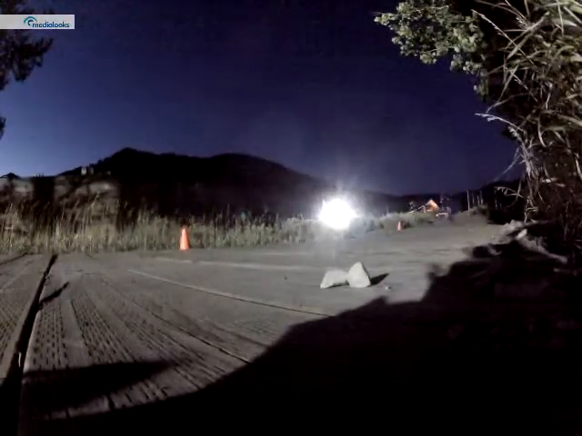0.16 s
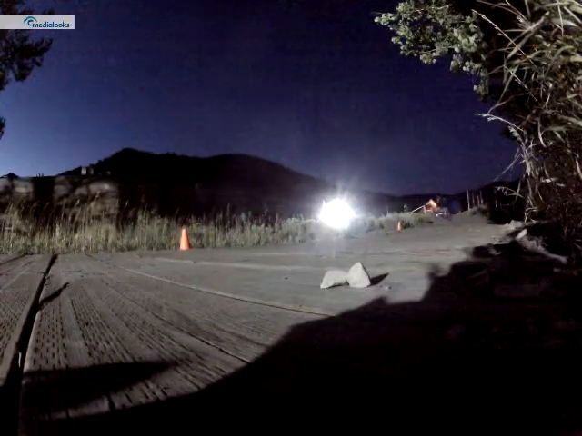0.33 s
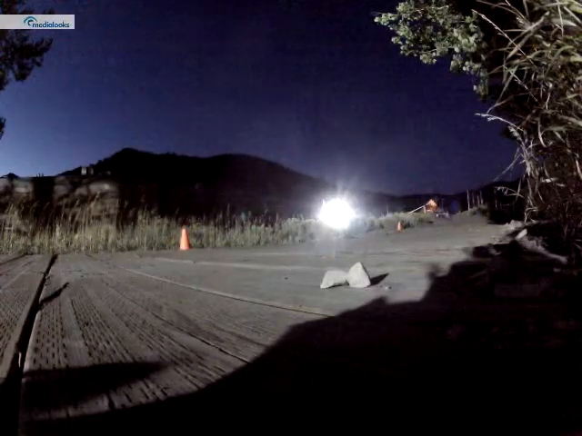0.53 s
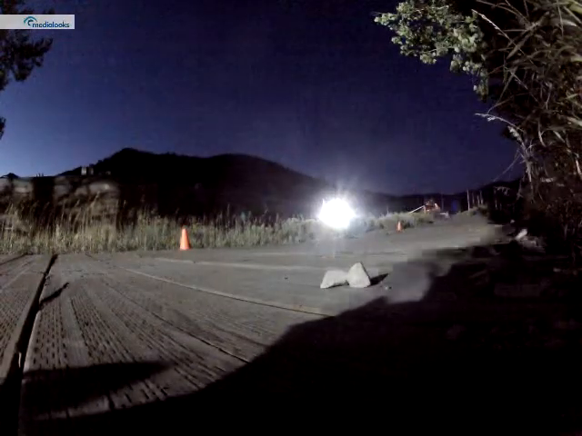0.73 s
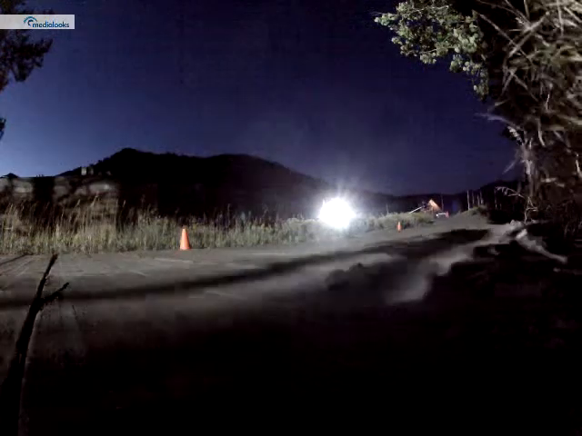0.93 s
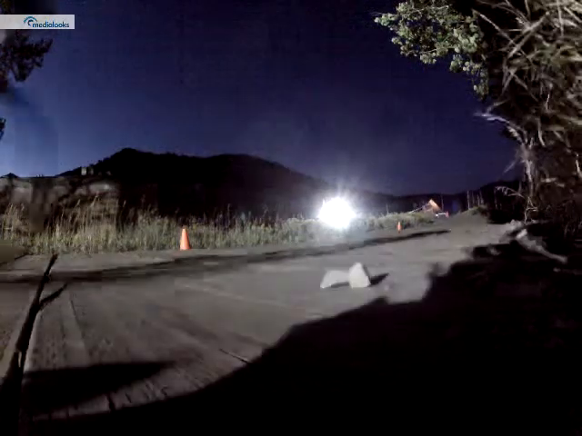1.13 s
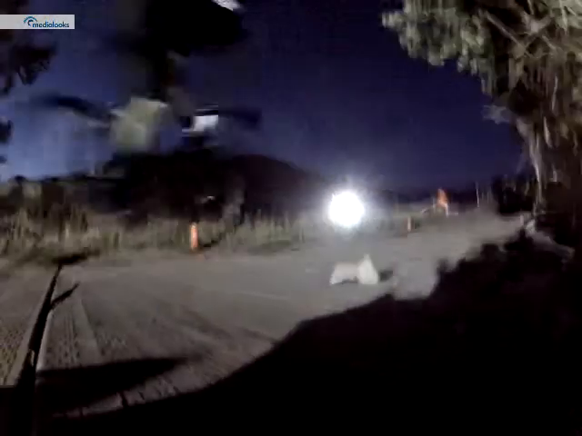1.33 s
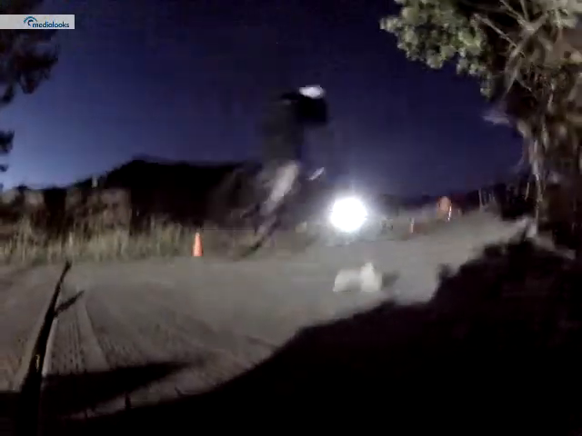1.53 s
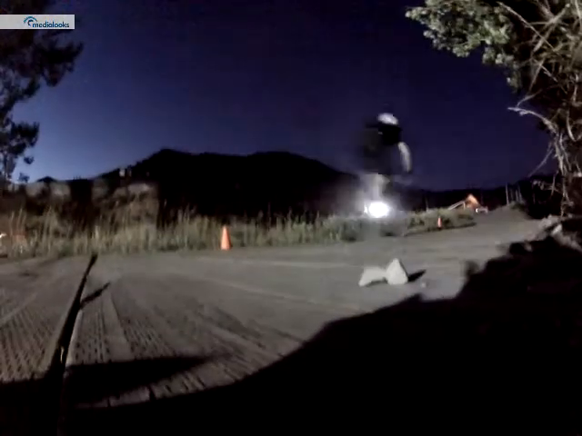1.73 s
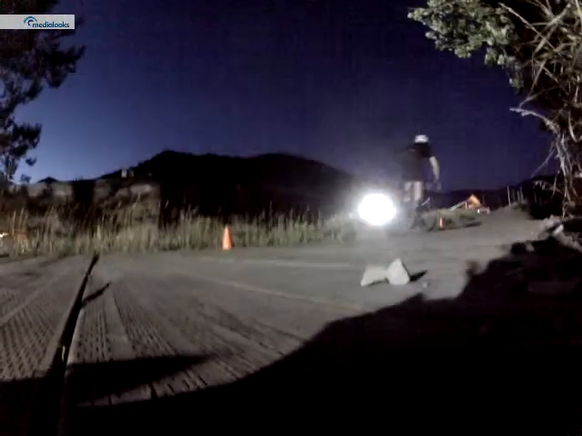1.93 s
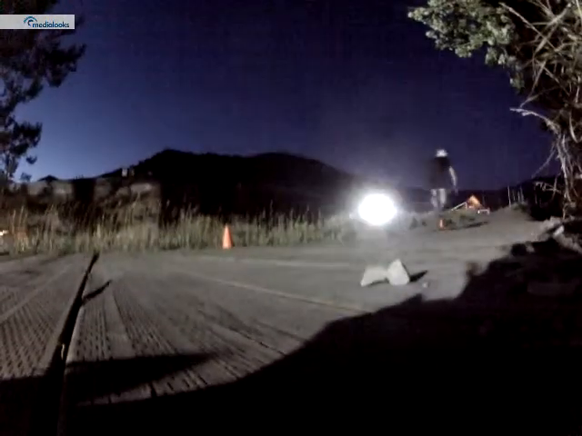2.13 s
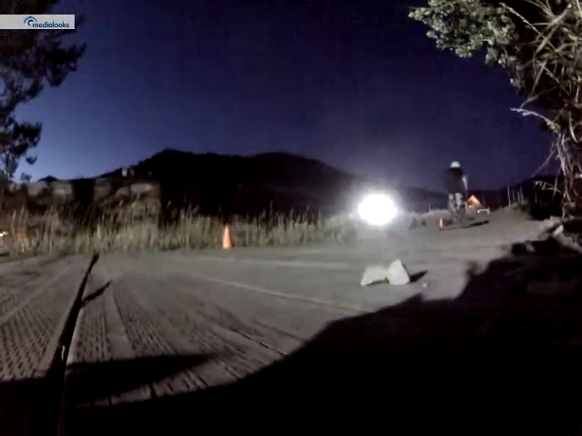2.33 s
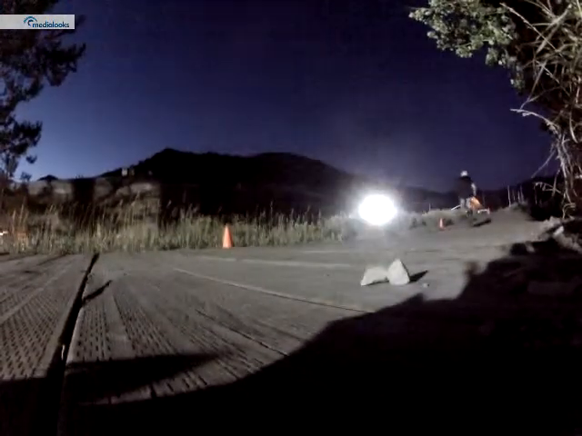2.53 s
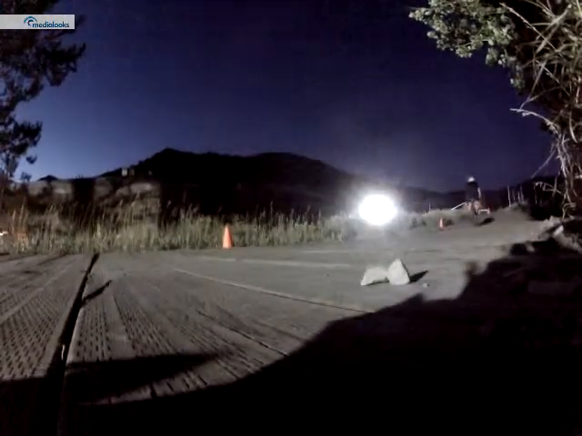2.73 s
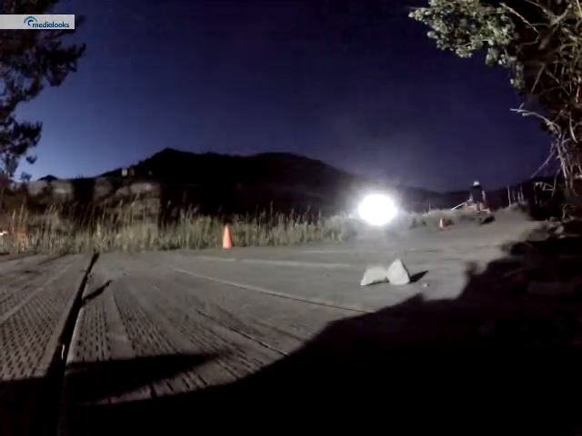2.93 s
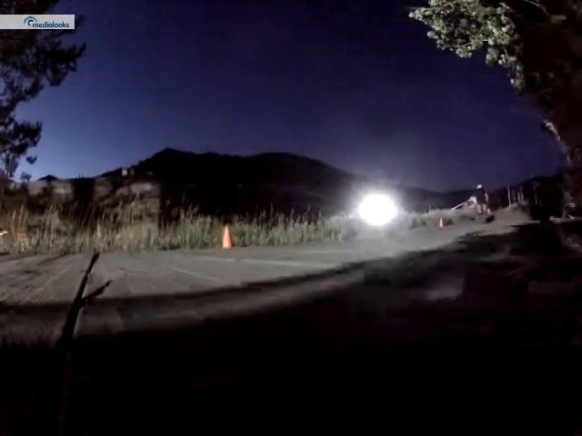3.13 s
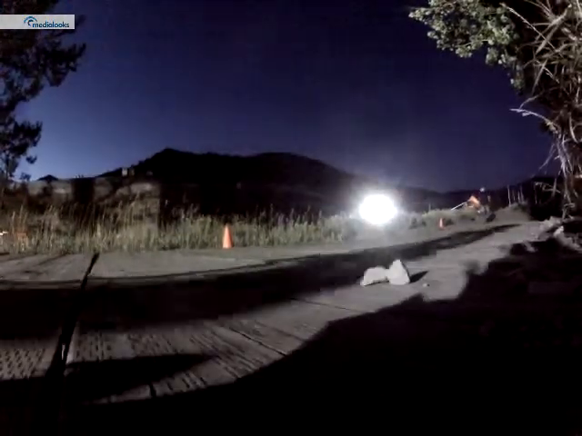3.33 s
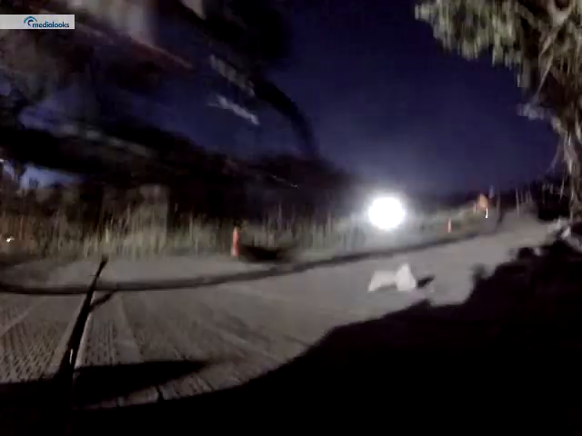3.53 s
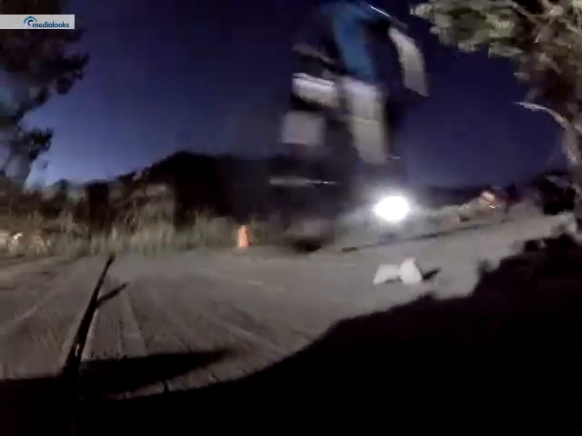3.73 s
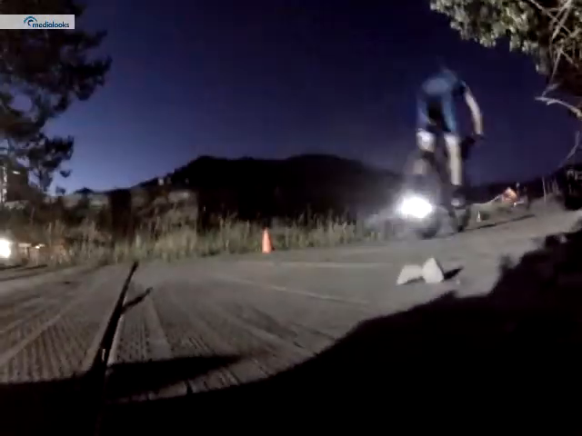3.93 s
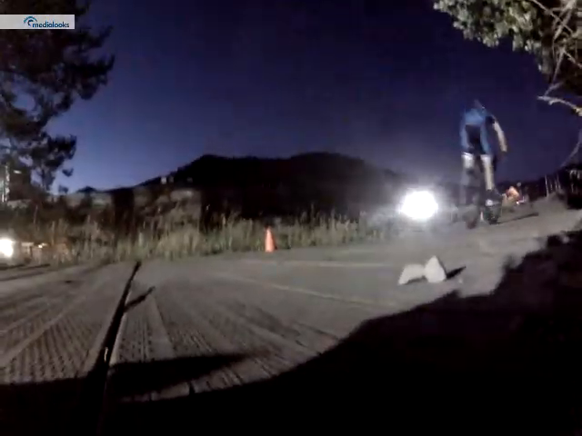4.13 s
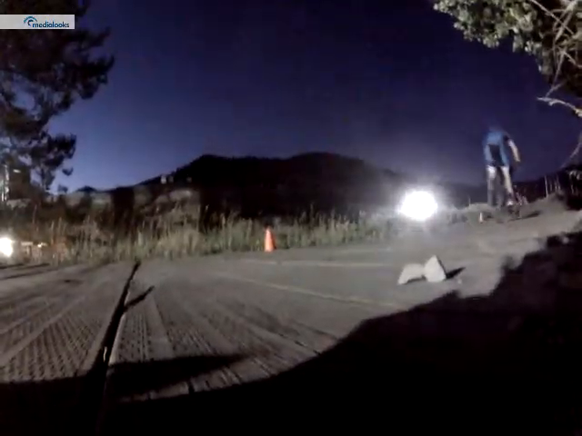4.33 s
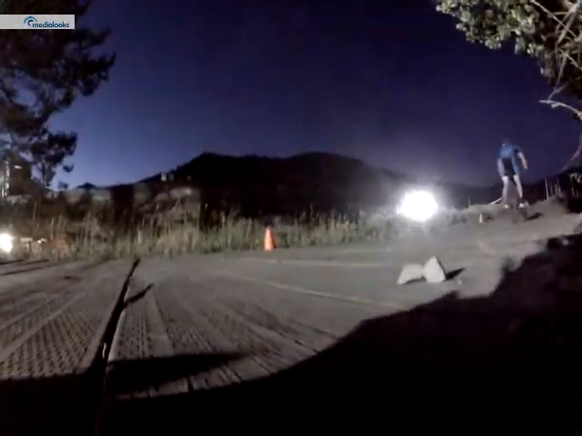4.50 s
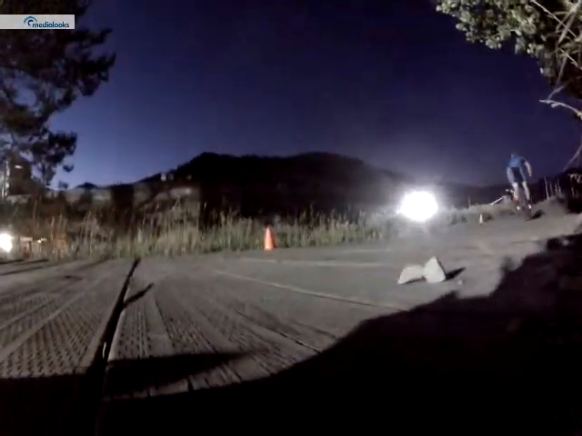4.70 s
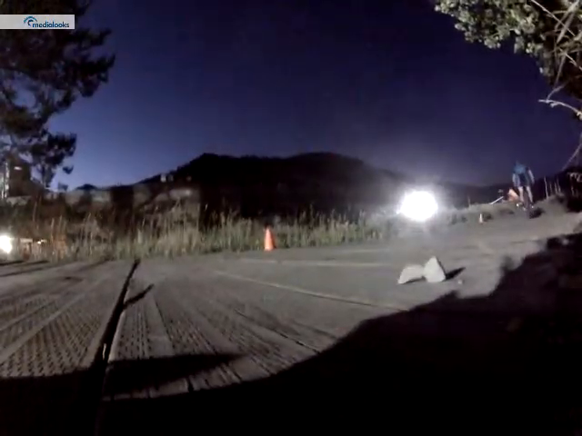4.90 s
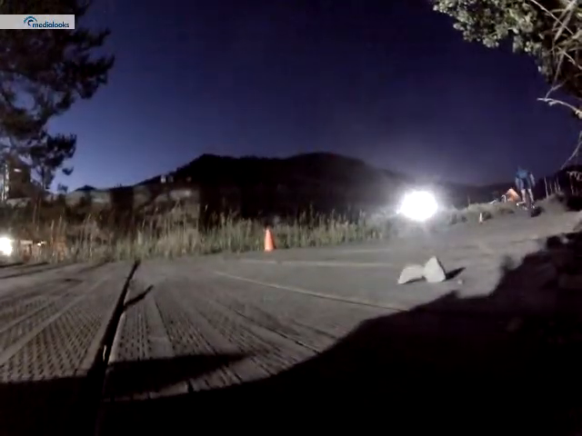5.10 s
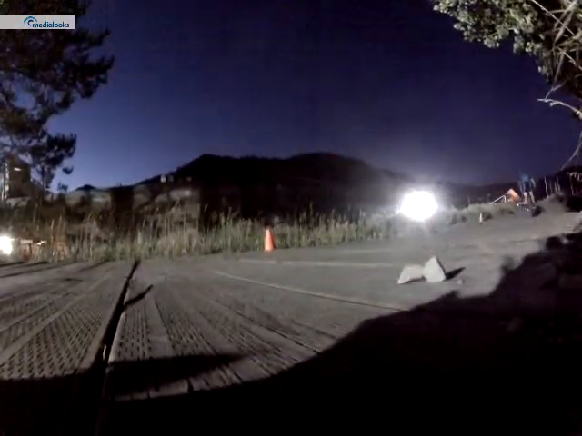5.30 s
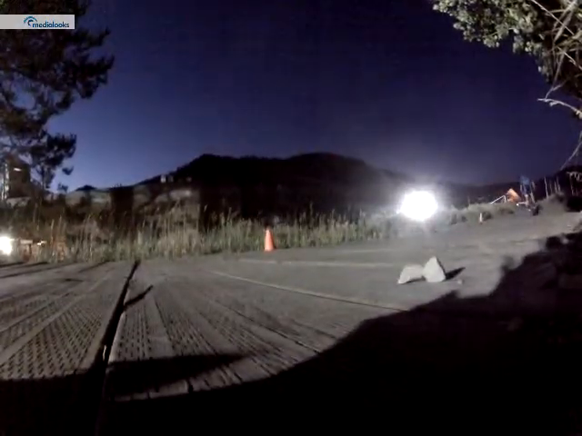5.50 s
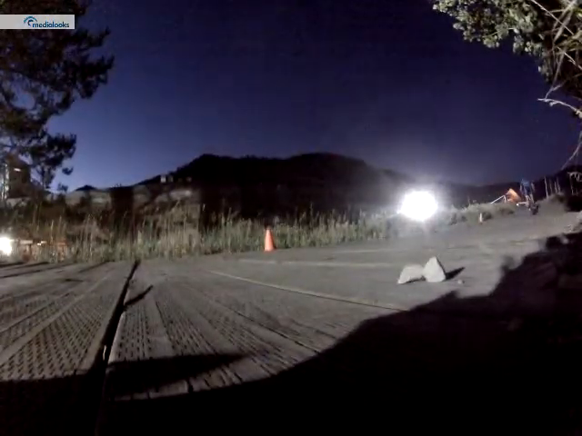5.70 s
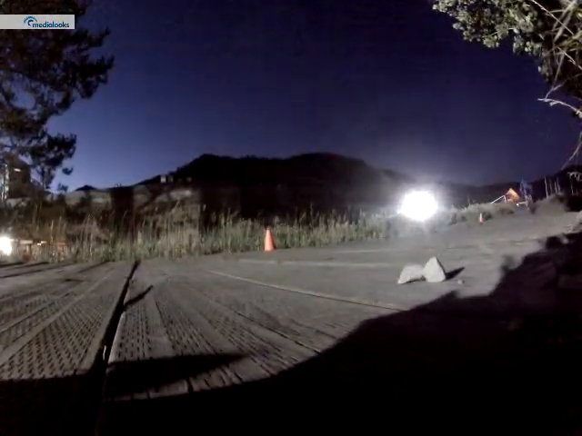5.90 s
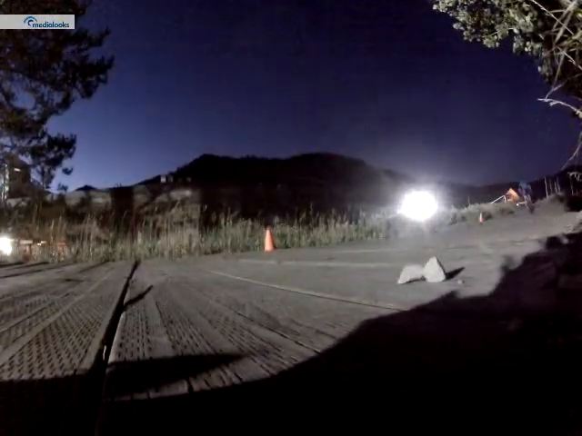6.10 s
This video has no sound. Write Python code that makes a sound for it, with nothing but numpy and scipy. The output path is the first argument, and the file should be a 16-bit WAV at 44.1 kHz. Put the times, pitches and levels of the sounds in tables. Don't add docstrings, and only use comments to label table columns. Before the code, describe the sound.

Two bicycles cross a plank deck in turn, right beside the microphone. Each pass bursts out of near silence with deep wooden rumble and a machine-gun clatter of plastic hopping on wood, with loose latch snaps, then dies away in light ticks. Between and after them there is only night air, hiss and a very low sway. The sound is boxy, distorted and harsh in the treble.

```python
import sys
import numpy as np
from scipy import signal
from scipy.fft import rfft, irfft
from scipy.io import wavfile
from scipy.ndimage import uniform_filter1d

SR = 44100
rng = np.random.default_rng(int(sys.argv[2]) if len(sys.argv) > 2 else 0)


def undo_db(level):
    steps = np.asarray(level, float) / 20
    return 10 ** steps


def persist_wave(psi):
    counts = np.round(np.clip(psi, -1, 1) * 32767).astype(np.int16)
    wavfile.write(sys.argv[1], SR, np.atleast_2d(counts).T)


N = 271215

# [t/s, level/dB]
SHAKE = [
    [(1.11, -62), (1.165, -32.5), (1.268, -12.5), (1.346, -17), (1.53, -14.5), (2.068, -26), (2.224, -31.5),
     (2.244, -42), (2.8, -65)],
    [(3.33, -59), (3.44, -33), (3.512, -9.5), (3.542, -14.5), (3.572, -4.5), (3.714, -20), (3.852, -14.5),
     (4.546, -36.5), (4.596, -44.5), (5.15, -66.5)],
]
# [t/s, f/Hz, level/dB]
SWAY = [
    [(0.0, 24, -52), (0.044, 24, -54), (0.418, 23.46, -59.5), (0.778, 23.5, -68), (0.87, 23.1, -57.5),
     (1.1, 23.34, -57)],
    [(2.0, 20.67, -42), (2.276, 20.94, -31.5), (2.486, 27, -47.5), (2.728, 23.93, -46), (2.95, 22.48, -43),
     (3.4, 28.4, -46.5)],
    [(4.3, 21.51, -24), (4.592, 22.32, -33), (4.686, 22.3, -45), (4.944, 22.37, -38), (5.654, 21.99, -45),
     (6.15, 21.94, -64)],
]
# [f/Hz, width/Hz, level/dB]
PLANKS = [(44, 4, -7.5), (64.5, 13, 8), (84, 26, 5), (116, 25, -3.5), (183, 81, -7)]
# [f/Hz, width/Hz, level/dB]
HOUSING_LOW = [(248, 24, -5.5), (307.9, 4.8, 2), (333.4, 12, -1.5), (435, 26, -5), (625, 56, -16),
               (718.4, 8.2, -7.5)]
# [f/Hz, width/Hz, level/dB]
HOUSING_HIGH = [(1166.5, 35, 15.5), (1240, 47, 11.5), (1480, 770, -21), (2380, 73, -12), (3770, 980, 5)]
SEATED_DAMP_DB = [-4, -7, -41, -14.5, 1.5, 2.5]
# [f/Hz, level/dB per Hz]
CLACK_SPECTRUM = [(240, -33), (400, 1.5), (1050, -2.5), (1770, -3.5), (2400, -2.5), (2620, -7.5),
                  (3110, -11), (4160, -19), (4760, -7.5), (5900, -17), (7670, -59), (13000, -120)]
# [f/Hz, level/dB per Hz]
NIGHT_SPECTRUM = [(29, -36), (50, -3.5), (70, -8.5), (103, -4), (138, -10.5), (273, -12), (449, -17.5),
                  (725, -22.5), (802, -25.5), (2500, -29.5), (5130, -34), (5900, -42), (7670, -76.5),
                  (13000, -120)]
# [f/Hz, width/Hz, level/dB]
ROCKING = [(90, 1.4, -6), (159, 12, -12.5), (207, 2.1, -8), (266.4, 13, -6)]
# [f/Hz, width/Hz, level/dB]
BUZZ_MODES = [(1070, 200, -4.5), (1570, 210, -1.5), (2230, 420, -1.5), (3600, 820, -10.5)]
# [t/s, peak level/dB, thin ring level/dB re peak]
LATCH = [(1.291, -37.5, -10), (1.363, -24, -11.5), (1.4269, -20.5, -16.5), (1.532, -13.5, -29),
         (1.5997, -50, -7), (1.642, -12.5, -7), (1.6823, -49, -12), (1.75, -22.5, -19), (1.781, -20.5, -19),
         (1.809, -33, -7), (2.022, -46, -6), (3.588, -19, -27), (3.629, -33.5, -6.5), (3.6686, -6, -26.5),
         (3.7965, -17, -12.5), (3.8303, -26.5, -2.5), (3.919, -33.5, -28.5), (3.988, -26, -16),
         (4.007, -43.5, -6), (4.0491, -50, 10)]
# [start t/s, length t/s]
HOPPING = [
    (1.231, 0.604),
    (3.47, 0.626),
]
# [t/s, peak level/dB, clack f/Hz, ring after take-off level/dB, push of the plank level/dB]
HOPS_FIRST = [(1.1861, -41, 1540, -28.5, -17), (1.2061, -34, 1387, -23, -20.5),
              (1.2433, -27.5, 1465, -17, -14), (1.2575, -21, 1500, -18.5, -6.5),
              (1.2685, -5.5, 1419, -7.5, -12.5), (1.2916, 1, 1842, -14.5, -14.5),
              (1.3341, -7, 1464, -11, -29), (1.3627, -9.5, 1611, -27, -18.5), (1.3928, -2, 2380, -9, -28),
              (1.4306, -9.5, 1410, -23, -9), (1.4415, -17.5, 1860, -14, -7.5),
              (1.4559, -23, 1505, -18, -35), (1.4665, -15, 1195, -9, -17),
              (1.4905, -13.5, 2367, -13, -12.5), (1.4995, -6, 1570, -5.5, -9),
              (1.5331, -1.5, 2510, -27.5, -2), (1.5415, -9.5, 2297, -16, -20),
              (1.5612, -6.5, 1440, -12, -12.5), (1.5995, -1, 2410, -13.5, -16.5),
              (1.6443, -6, 1480, -15.5, -3.5), (1.6831, -8, 2460, -12, -15), (1.726, -7.5, 1600, -9, -48),
              (1.751, -11.5, 1400, -11, -10), (1.7853, -8, 1380, -12.5, -10), (1.8057, -16, 2600, -27, -24),
              (1.8165, -24, 2470, -19, -32), (1.8255, -25, 1500, -25, -25)]
HOPS_SECOND = [(3.468, -27.5, 2518, -31, -21), (3.484, -24, 1542, -12.5, -8),
               (3.4965, -16.5, 1304, -16.5, -15), (3.5040, -7.5, 1630, -6, -4.5),
               (3.5264, -3.5, 1470, -4.5, -12.5), (3.5588, -10.5, 1390, -10.5, -16.5),
               (3.5707, -14.5, 1340, -2, -6.5), (3.5897, -4.5, 2330, -11, -3),
               (3.6277, -7, 1347, -10.5, -5), (3.6683, -1, 1545, -23.5, -16),
               (3.696, -11.5, 1680, -21, -17), (3.7303, -22, 1520, -18, -11.5),
               (3.7700, -40.5, 1600, -18, -21), (3.7969, -1, 2100, -9, -14),
               (3.8322, -12, 1500, -14.5, -10.5), (3.8567, -16, 1550, -8.5, -15.5),
               (3.8918, -1.5, 1862, -18.5, -29), (3.919, -15.5, 1425, -12.5, -27),
               (3.9295, -25, 1500, -26.5, -23), (3.9420, -40, 1490, -14, -18.5),
               (3.9663, -28, 1350, -11.5, -19), (3.9883, -9.5, 1920, -19.5, -30),
               (4.0073, -10, 1810, -12.5, -18), (4.029, -26, 1300, -31, -35), (4.0465, -21, 2180, -18, -25),
               (4.059, -18, 2190, -18, -22), (4.071, -27, 2080, -16.5, -20), (4.1061, -21, 1150, -24, -12)]
# [free ring f/Hz, swing of the plank f/Hz]
GRIPS = [(291.5, 72), (249, 80), (299, 150), (371, 180), (337, 79), (324.2, 140), (336, 80), (349, 80),
         (329.3, 70), (286, 45), (298, 63), (293, 80), (329, 110), (252, 170), (436, 60), (312, 200),
         (314, 135), (338, 70), (336, 75), (340, 110), (341.6, 67), (262.5, 48), (324, 75), (322, 110),
         (410, 124), (285, 160), (310, 60), (297, 160), (238, 102), (329.6, 109), (340.3, 120), (285.6, 75),
         (226, 75), (316.5, 135), (327, 79), (333.3, 75), (346, 38), (308.4, 132), (310, 72), (340, 60),
         (333, 110), (342, 96), (354, 66), (356, 85), (249, 110), (346, 100), (351, 87), (330, 50),
         (272, 110), (302, 62), (284, 65), (296, 150), (245, 99), (301, 83), (283, 110)]
# [t/s, peak level/dB, clack f/Hz, weight of the touch level/dB]
TICKS_FIRST = [(1.1182, -52, 1645, -59), (1.152, -53, 1400, -52), (1.8581, -35, 1490, -21),
               (1.8978, -32, 2220, -22), (1.9145, -36, 1670, -25), (1.9419, -28.5, 2430, -17.5),
               (1.9526, -26.5, 1630, -15.5), (1.9574, -26, 1770, -22), (1.9765, -52, 1710, -50),
               (1.989, -35, 2330, -38), (2.0003, -32, 2220, -51), (2.0209, -18, 1950, -46),
               (2.0518, -30, 2380, -44), (2.0638, -28, 2060, -21), (2.0831, -28.5, 1920, -19.5),
               (2.1185, -32, 2360, -23.5), (2.1607, -30.5, 2020, -49), (2.172, -32, 1960, -53),
               (2.2093, -32.5, 2070, -60), (2.2394, -41, 1400, -60), (2.2578, -32, 2680, -52),
               (2.2948, -34, 2240, -68), (2.3412, -30.5, 2180, -37.5), (2.391, -51, 2150, -68),
               (2.4105, -65, 2160, -68), (2.4528, -66, 1860, -63), (2.4674, -64, 1600, -66),
               (2.5132, -47, 2375, -77), (2.6196, -42, 2380, -63), (2.7114, -43, 2040, -56)]
TICKS_SECOND = [(3.4183, -44.5, 2380, -33), (3.4447, -43, 2350, -53), (4.1175, -46, 2420, -23),
                (4.1375, -28, 2380, -16.5), (4.169, -25, 1630, -28), (4.1907, -28.5, 2320, -38),
                (4.1971, -30, 2190, -28), (4.2283, -37, 2570, -55), (4.2505, -39, 2340, -53),
                (4.2692, -29, 1520, -48), (4.2845, -30, 2530, -25.5), (4.2989, -28, 1810, -40),
                (4.3329, -32, 2150, -43), (4.346, -37, 1820, -27), (4.364, -37, 2600, -50),
                (4.3784, -28.5, 1880, -22.5), (4.4295, -35, 2520, -48), (4.4475, -44, 2260, -43),
                (4.4695, -34.5, 2370, -42), (4.4814, -40, 2417, -25.5), (4.4979, -38, 1790, -33),
                (4.5312, -33.5, 2680, -33), (4.5603, -57, 2200, -55), (4.576, -33, 3030, -58.5),
                (4.6185, -36, 2120, -63), (4.6713, -51.5, 2040, -50), (4.818, -45.5, 1802, -65),
                (4.839, -50, 2050, -67), (4.8844, -51, 1876, -62), (4.9347, -38.5, 2600, -53),
                (4.9736, -50, 2194, -60), (5.0223, -35, 2016, -54), (5.1136, -39.5, 3010, -70),
                (5.1602, -22, 1985, -43), (5.218, -55, 1910, -70.5), (5.294, -52.5, 2050, -70),
                (5.347, -55.5, 1796, -70), (5.398, -56.5, 2296, -70), (5.457, -54.5, 2100, -70),
                (5.503, -56, 2400, -70), (5.612, -54, 3210, -70)]
# [start t/s, length t/s, share of the rattle kept]
GRATING = [
    (1.432, .07, .6),
    (1.73, .1, 1),
    (3.49, .12, 0.96),
    (4.5, 0.11, 0.31),
    (1.8, .03, 0.91),
    (7.1, .06, 0.61),
]
# [start t/s, length t/s, level/dB]
LOOSE_PLANK = [
    (2.02, 0.066, 6),
    (2.1, .12, 4),
    (2.5, 0.13, 7),
]
# [start t/s, length t/s, level/dB]
ROCKS = [
    (.2, 0.27, -67),
    (.93, .12, -61),
    (1.12, 0.049, -53.5),
    (2.25, 0.047, -69),
    (3.2, 0.1, -66),
    (4.68, 0.34, -49.5),
]
# [start t/s, length t/s, level/dB]
BUZZES = [
    (.36, 0.053, -67),
    (.85, 0.22, -66.5),
    (3.08, 0.06, -66),
    (3.35, 0.096, -63.5),
    (4.6, 0.048, -69),
    (4.83, 0.039, -84),
    (5.3, 0.46, -79),
]


def knocks(rows):
    grits = rng.standard_normal((len(rows), 1764))
    chances = rng.random((len(rows), 16))
    contact, push, low_ring, high_ring = np.zeros((4, N))
    gaps = np.diff(rows[:, 0], append=N / SR)
    for row, grit, chance, gap in zip(rows, grits, chances, gaps):
        s, peak_db, hz, thump_db, ring_db, edge_db, seated, ring_hz, swing_hz = row
        long, _, side, late, shift = chance[:5]
        strength = chance[5:] - .5
        tune = 1 + .05 * (2 * shift - 1)
        i = round(s * SR) - 12

        burst, edge = clack(grit, peak_db, hz, edge_db, seated, long, late)
        contact[i:i + len(burst)] += burst + edge

        upper = upper_ring(burst, (peak_db + ring_db) / 2, seated, tune, gap, strength[6:])
        high_ring[i:i + len(upper)] += upper

        lower = lower_ring(ring_db + 6 * strength[:6], ring_hz, seated, tune, gap)
        low_ring[i:i + len(lower)] += lower

        if seated:
            dip = tick_dip(thump_db, late)
            push[i - len(dip) // 2:i + len(dip) // 2] -= dip
        else:
            swing = np.sign(side - .75) * plank_swing(thump_db, swing_hz, gap)
            push[i:i + len(swing)] += swing
    return contact + push + undo_db(41.0) * low_ring + undo_db(-9.5) * below(high_ring, 4100, order=8)


def clack(grit, peak_db, hz, edge_db, seated, long, late):
    t = np.arange(len(grit)) / SR
    decay_s = 0.0028 * 1.057 * (1 + long / 2) * (1 - 0.28 * seated)
    rebound = 0.098 * late * np.exp(-((t - .006 - 0.0096 * late) / 0.0052) ** 2)
    fade = np.exp(-t / decay_s) + 0.24 * np.exp(-t / 0.0032) + rebound + 0.034 * np.exp(-t / 0.01)
    raw = grit * (1 - np.exp(-t / 0.00015)) * fade

    burst = between(colour(raw, CLACK_SPECTRUM), [600, 4100], order=7)
    if seated:
        burst = signal.sosfilt(signal.butter(2, 1350, "high", fs=SR, output="sos"), burst)
    burst = rms_one(burst) + .9 * rms_one(resonate(burst, hz, width=350))
    burst = undo_db(peak_db) * burst / np.abs(burst).max()

    wide = peak_db > -7 or seated
    edge = between(raw * np.exp(-t / .004), [4150, 6300] if wide else [4650, 5550], order=4)
    return burst, undo_db(edge_db + 9.0) * edge / np.abs(edge).max()


def upper_ring(burst, pluck_db, seated, tune, gap_s, strength):
    scrape = np.pad(burst, (0, 2 * len(burst)))
    t = np.arange(len(scrape)) / SR
    rings = sum(body(scrape, [(hz * tune, width, db + 10.0 * x - 14 * seated)])
                for (hz, width, db), x in zip(HOUSING_HIGH[2:], strength[2:]))
    pair = sum(body(1. * (t == 0), [(hz * (1 + tune) / 2, width, db + 8.0 * x)])
               for (hz, width, db), x in zip(HOUSING_HIGH[:2], strength[:2]))
    let_go = 1 / (1 + np.exp((.009 / 2 - t) / 0.0024))
    rings = rings + undo_db(pluck_db + 10.5 - 7.5 * seated + 18.5) * pair * let_go
    return rings * stopped(t, gap_s)


def lower_ring(levels_db, ring_hz, seated, tune, gap_s):
    octaves = np.log2(ring_hz / np.array(HOUSING_LOW)[:4, 0])
    if seated:
        levels_db = levels_db + np.array(SEATED_DAMP_DB)
    else:
        levels_db = levels_db + np.pad(-28.5 * np.abs(octaves), (0, 2)) + 3.5
        tune = 2 ** octaves[np.abs(octaves).argmin()]
    held_s = .009 * (1 - seated)

    t = np.arange(SR // 10) / SR
    blow = below(1. * (t == 0), 660)
    modes = [undo_db(db) * body(blow, [(hz * tune, width, own_db)])
             for db, (hz, width, own_db) in zip(levels_db, HOUSING_LOW)]
    let_go = 1 / (1 + np.exp((held_s - t) / 0.0024))
    return (let_go * sum(modes[:4]) + undo_db(-4) * sum(modes[4:])) * stopped(t, gap_s)


def plank_swing(thump_db, swing_hz, gap_s):
    t, lag_s = np.arange(1764) / SR, 0.0027
    turn = np.clip((t - lag_s) * swing_hz, 0, 1)
    swing = np.sin(2 * np.pi * turn) * np.exp(-t / 0.026) * stopped(t, gap_s + 2 * lag_s)
    return undo_db(thump_db - 3.0) * swing


def tick_dip(thump_db, late):
    t = np.arange(1764) / SR
    cusp = np.exp(-np.abs(t - .02) / 0.0048)
    lift = np.exp(-((t - .02) / 0.009) ** 2)
    cusp = cusp - lift * cusp.sum() / lift.sum()
    return undo_db(thump_db + 7 + 6 * (late + 0.5)) * cusp


def stopped(t, gap_s):
    return np.exp(-np.maximum(t - gap_s, 0) / 0.0019)


def landings(shake_db):
    s, peak, hz, ring, thump = np.transpose(list(HOPS_FIRST) + list(HOPS_SECOND))
    edge = peak + np.maximum(-21 + 3.7 * peak, -36.5)
    hops = [s, peak, hz, thump + 4.5, ring + 16, edge, 0 * s, *np.transpose(GRIPS)]

    s, peak, hz, weight = np.transpose(list(TICKS_FIRST) + list(TICKS_SECOND))
    thump = shake_db[(s * SR).astype(int)] + 3.5
    edge = np.minimum(peak - 23, -53.5)
    one = np.ones(len(s))
    ticks = [s, peak, hz, thump, weight + 12, edge, one, one, one]
    rows = np.hstack([hops, ticks]).T
    return rows[np.argsort(rows[:, 0])]


def rattle(level_db, seated):
    together_db = (4.5 * drift(70) + 2.5 * drift(20)) * (1 - .5 * seated)
    chatter = colour(grains(per_s=3300, spread_db=4.0) * undo_db(together_db), CLACK_SPECTRUM)
    shell = below(chatter, 4050, order=16)
    parts = sum(body(shell * undo_db(6 * drift(40)), [mode]) for mode in HOUSING_HIGH[2:])
    shell = shell + undo_db(5.0) * parts
    shell = shell - .5 * part_of(shell, [2750, 3550], "band", order=3)
    shell = shell - .65 * seated * part_of(shell, 2700, "high", order=6)
    return undo_db(level_db - 5.5) * rms_one(shell + undo_db(-9.5) * between(chatter, [4750, 5450], order=4))


def hum(level_db, seated):
    blows = below(grains(per_s=110, spread_db=1.5), 540, order=4)
    ring = 0
    for k, (mode, damp_db) in enumerate(zip(HOUSING_LOW, SEATED_DAMP_DB)):
        ring = ring + (-1) ** k * undo_db(damp_db * seated) * body(blows, [mode])
    return undo_db(level_db + 2.0) * ring / np.std(body(blows, HOUSING_LOW))


def latch():
    t = np.arange(600) / SR
    scratch, pluck = np.zeros((2, N))
    for s, peak_db, ring_db in LATCH:
        grit = rng.standard_normal(len(t)) * t * np.exp(-t / 0.0013)
        burst = resonate(resonate(grit, 3900, 300), 3850, 420)
        i = round(s * SR)
        scratch[i:i + len(t)] += undo_db(peak_db) * burst / np.abs(burst).max()
        pluck[i + 200] += undo_db(peak_db + ring_db + 49.5)
    return below(scratch, 4080, order=12) + resonate(resonate(pluck, 3150, 33), 2600, 870)


def boom(level_db):
    blows = below(grains(per_s=110, spread_db=-0.5), 370)
    return undo_db(level_db + 3.5) * rms_one(body(blows, PLANKS))


def slip():
    squeak = body(rng.standard_normal(N), [(688, 7.4, 4.5), (610, 42, -10.0), (476, 12, -2.0)])
    return undo_db(swells([(4.715, 0, -46.5)], rise=2500, fall=206)) * rms_one(below(squeak, 890))


def resting():
    tone_db = np.maximum(-73, swells(ROCKS, rise=101, fall=300.5))
    buzz_db = np.maximum(-81.5, swells(BUZZES, rise=60, fall=59.5))
    tone = rms_one(body(below(rng.standard_normal(N), 550), ROCKING))
    steady = np.sqrt(2) * np.sin(2 * np.pi * np.cumsum(ROCKING[-1][0] + 10 * drift(9)) / SR)
    tone = tone + 0.87 * undo_db(np.minimum(tone_db + 56.5, 0) / 2) * steady
    buzz = rms_one(body(below(rng.standard_normal(N), 5900, order=6), BUZZ_MODES))
    throb_db = np.sin(bounce()[0] + 3.9)
    return undo_db(tone_db + 2.5) * tone + undo_db(buzz_db + 1.0 * drift(35) + throb_db) * buzz


def heave(shake_db):
    hz, width_hz = 32.8, 12
    sag = resonate(resonate(rng.standard_normal(N), hz, width_hz), hz, 2 * width_hz)
    return undo_db(-30.5 + 0.66 * (np.minimum(shake_db, -16) + 20.5)) * rms_one(sag)


def sway():
    phase, level_db = bounce()
    wave = np.sin(phase) + 0.033 * np.sin(2 * phase) + 0.036 * np.sin(4 * phase)
    return np.sqrt(2) * undo_db(level_db) * wave


def bounce():
    hz, level_db = in_time(SWAY)
    phase = 2 * np.pi * np.cumsum(hz) / SR
    return phase - phase[round(5.16 * SR)] - np.pi / 2, level_db


def night():
    return undo_db(-59.5 + 0.78 * drift(2.2)) * rms_one(colour(rng.standard_normal(N), NIGHT_SPECTRUM))


def rms_one(x):
    return x / np.sqrt(np.mean(x ** 2) + 1e-20)


def in_time(spans):
    rows = []
    for span in spans:
        first, last = span[0], span[-1]
        rows += [(first[0] - .05, *first[1:-1], -90), *span, (last[0] + .05, *last[1:-1], -90)]
    s, *columns = np.transpose(rows)
    return [np.interp(np.arange(N) / SR, s, c) for c in columns]


def swells(rows, rise, fall):
    t = np.arange(N) / SR
    levels = [db - rise * np.maximum(s - t, 0) - fall * np.maximum(t - s - hold, 0)
              for s, hold, db in rows]
    return np.max(levels, axis=0)


def drift(rate):
    r = np.exp(-2 * np.pi * rate / SR)
    return rms_one(signal.lfilter([1], [1, -2 * r, r * r], rng.standard_normal(N + SR))[SR:])


def grains(per_s, spread_db):
    sizes = undo_db(spread_db * np.minimum(rng.exponential(1, N), 4)) * rng.choice([-1, 1], N)
    return sizes * (rng.random(N) < per_s / SR)


def resonate(x, hz, width):
    r = np.exp(-np.pi * width / SR)
    feedback = [1, -2 * r * np.cos(2 * np.pi * hz / SR), r * r]
    return signal.lfilter([(1 - r * r) / 2, 0, (r * r - 1) / 2], feedback, x)


def body(x, modes):
    return sum((-1) ** k * undo_db(db) * resonate(x + 1e-18, hz, width)
               for k, (hz, width, db) in enumerate(modes))


def colour(x, spectrum):
    hz = np.maximum(np.arange(2049) * SR / 4096, 1)
    table_hz, table_db = np.transpose(spectrum)
    log_gain = np.interp(np.log(hz), np.log(table_hz), table_db) * np.log(10) / 20
    cepstrum = irfft(log_gain)
    cepstrum[1:2048] *= 2
    cepstrum[2049:] = 0
    return signal.fftconvolve(x, irfft(np.exp(rfft(cepstrum))))[:len(x)]


def below(x, hz, order=2):
    return signal.sosfilt(signal.butter(order, hz, fs=SR, output="sos"), x)


def between(x, band_hz, order):
    return signal.sosfilt(signal.butter(order, band_hz, "band", fs=SR, output="sos"), x)


def part_of(x, hz, kind, order):
    return signal.sosfiltfilt(signal.butter(order, hz, kind, fs=SR, output="sos"), x)


def scene():
    t = np.arange(N) / SR
    shake_db = in_time(SHAKE)[0]
    rows = landings(shake_db)
    lift_db = swells([(s, hold, 0) for s, hold in HOPPING], rise=284.5, fall=252.5)
    seated = np.clip(lift_db / -3.5, 0, 1)
    arrived_db = swells([(s, 2, 0) for s, hold in HOPPING], rise=284.5, fall=252.5)
    arrived_db = np.maximum(arrived_db, -14)

    last_s = rows[np.searchsorted(rows[1:, 0], t), 0]
    since_s = np.maximum(t - last_s - .009 * (1 - seated / 2), 0)
    air_db = np.maximum(-600 * since_s, -24)
    lose_db = np.maximum(-1497 * since_s, -24)
    skid = sum(np.clip(kept, 0, 1) * (t > s) * (t < s + hold) for s, hold, kept in GRATING)
    air_db = air_db * (1 - skid)

    hum_db = -24.5 + 0.88 * np.minimum(shake_db + 20, 0) - 4 * seated
    touching = uniform_filter1d(1. * (since_s == 0), size=130)
    hum_db = hum_db - 14 * touching * (1 - seated)

    rattle_db = -31 + 0.71 * np.minimum(shake_db + 23.5, 0) + np.maximum(lift_db, -2) + arrived_db
    rattle_db = rattle_db + (uniform_filter1d(air_db, size=90) + 2.0) * (1 - .1 * seated)

    felt_db = shake_db + uniform_filter1d(lose_db, size=150) * (1 - seated)
    felt_db = felt_db - 5.5 * seated * (arrived_db == 0)
    felt_db = felt_db + np.maximum(swells(LOOSE_PLANK, rise=500, fall=200), 0)

    shaken = boom(felt_db) + hum(hum_db, seated) + rattle(rattle_db, seated) + knocks(rows) + latch()
    shaken = shaken - .75 * (1 - seated) * part_of(shaken, [4230, 4620], "band", order=3)

    late_shake_db = np.roll(shake_db, round(.04 * SR))
    load_db = np.maximum(late_shake_db, bounce()[1] - 18.5)
    return (shaken + resting() + slip() + sway() + night() + heave(load_db))[None]


def top_cut(x):
    return signal.sosfilt(signal.butter(12, 16500, fs=SR, output="sos"), x)


def record(dry):
    hot = 1.03 * np.tanh((np.abs(dry) / 1.03) ** 3) ** (1 / 3) * np.sign(dry)
    slow = signal.resample_poly(hot, up=40, down=147, axis=1)
    held = np.repeat(slow, repeats=4, axis=1)
    out = signal.resample_poly(held, up=147, down=160, axis=1)[:, :N]
    out = np.pad(out, ((0, 0), (0, N - out.shape[1])))
    out = signal.sosfilt(signal.cheby2(14, 26, 15600, fs=SR, output="sos"), out)
    out = np.clip(out, -1, 1)
    out = signal.sosfilt(signal.cheby2(10, 50, 16500, fs=SR, output="sos"), out)
    return top_cut(out)


dry = scene()
out = record(dry)
persist_wave(out)
```